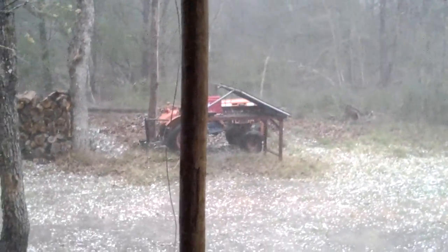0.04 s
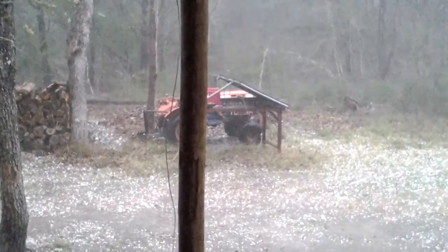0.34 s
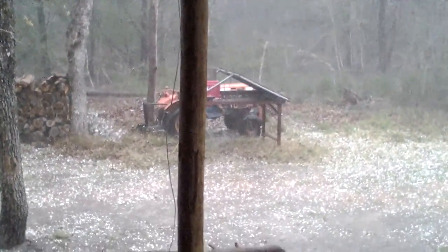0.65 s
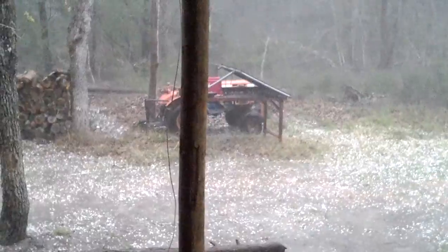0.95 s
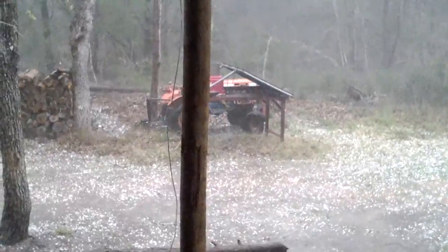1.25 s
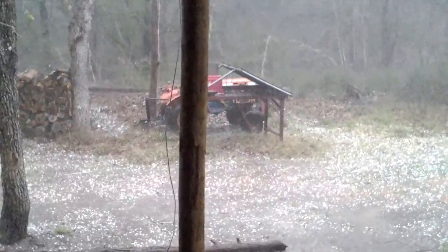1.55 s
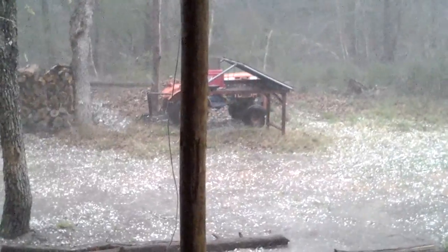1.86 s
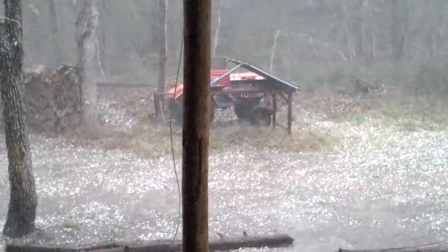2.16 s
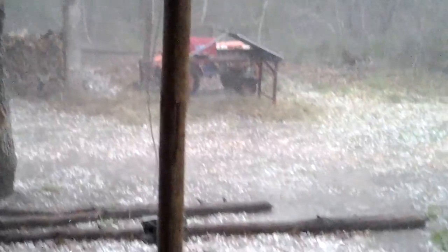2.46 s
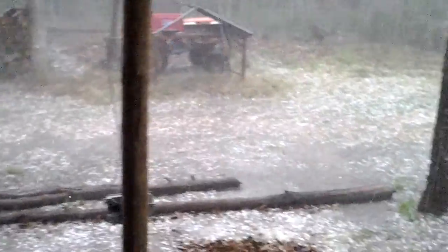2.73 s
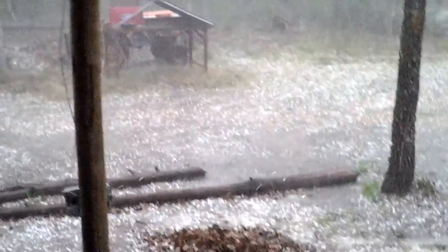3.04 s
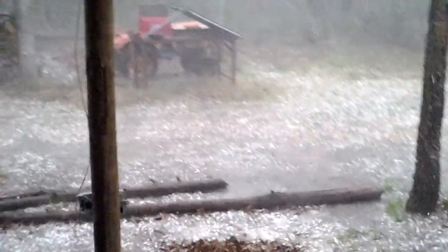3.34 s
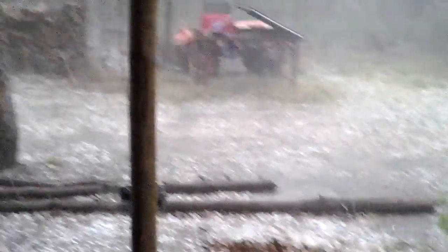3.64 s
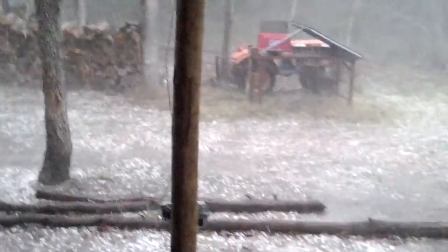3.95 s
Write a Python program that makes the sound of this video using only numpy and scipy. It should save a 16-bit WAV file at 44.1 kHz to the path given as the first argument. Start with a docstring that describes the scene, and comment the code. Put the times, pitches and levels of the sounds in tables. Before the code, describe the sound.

Heavy hail and rain roar steadily while big stones knock on a roof overhead.

```python
"""Under a porch roof in heavy hail and rain, one microphone facing the yard.
Overhead, big stones thud and knock on the roof and shatter in short sprays of ice, while many middling
ones keep it drumming and ringing. Small pellets tick close by. Farther out, countless stones and drops
merge into a roar. A fast limiter catches the loudest peaks."""
import sys
import numpy as np
from scipy import signal
from scipy.fft import rfft, irfft
from scipy.io import wavfile
from scipy.ndimage import uniform_filter1d, minimum_filter1d

SR = 44100
rng = np.random.default_rng(int(sys.argv[2]) if len(sys.argv) > 2 else 0)


def generate_wav(signal):
    """Clip the signal to [-1, 1] and save it as 16-bit WAV at the path in sys.argv[1]."""
    frames = np.transpose(np.atleast_2d(signal))
    scaled = np.clip(frames, -1, 1) * 32767
    pcm = np.round(scaled).astype(np.int16)
    wavfile.write(sys.argv[1], SR, pcm)


N = 176400  # 4 s
TIME = np.arange(N) / SR
THUD_T60_S, KNOCK_T60_S, SPRAY_T60_S = 0.14, 0.11, 0.13
ROOF_ATTACK_S, SPRAY_ATTACK_S = 0.0021, 0.0052

# Spectra of the roof's low thud, its hard knock and the bursting ice: (frequency [Hz], level [dB])
THUD_SPECTRUM = [(100, -101), (200, -20), (330, 3), (470, 3.5), (600, -4), (900, -18), (2000, -42)]
KNOCK_SPECTRUM = [(120, -55), (330, -18.5), (580, -16), (820, -2.5), (1230, -3.5), (1440, -2), (1850, -2.5),
                  (2400, -11), (5000, -20), (14000, -58)]
SPRAY_SPECTRUM = [(150, -54), (900, -18), (2500, 0.5), (5100, -1.5), (5800, -7.5), (6800, -2),
                  (8500, -10.5), (12000, -16), (14500, -25)]
# The biggest strikes overhead, each level relative to that part's base level: (time [s],
# thud level [dB], thud pitch [Hz], knock level [dB], knock pitch [Hz], spray level [dB])
BIG_STRIKES = [(.03, -13, 400, -10, 1010, -4), (.14, -14, 398, -6, 1460, -9),
               (0.296, -18, 403, 2.5, 1525, -7), (.373, -3, 478, -11, 1480, 3),
               (.416, -7, 470, -6, 1570, 5.5), (.445, 4, 546, 3.5, 1577, -6), (0.606, 0, 391, -4, 1850, 0),
               (0.683, -1, 464, -5, 1550, -9), (0.862, 2, 399, -1, 1900, 3.5),
               (0.899, 5.5, 335, -3, 1510, -6), (.956, -11, 406, 3, 1550, -14),
               (1.014, -2, 400, -1, 2000, -5), (1.076, 5, 626, 3.5, 1100, 2.5),
               (1.125, -11, 347, 4, 1740, -13), (1.168, -8, 404, 4.5, 1670, -8),
               (1.248, -10, 330, -6, 930, 3), (1.284, 0, 145, -17, 1500, 2), (1.35, 0, 407, -4, 1476, 5.5),
               (1.383, -11, 393, 2, 973, -12), (1.759, 1.5, 357, -10, 1460, 3.5),
               (1.814, 5.5, 430, 2.5, 1146, -15), (1.845, -2, 346, -4, 856, -11),
               (1.884, -17, 400, -13, 1500, 6), (2.062, -3, 353, 3.5, 1585, 6),
               (2.098, 3.5, 469, 2.5, 1070, 0), (2.171, -11, 395, -4.5, 1860, 0),
               (2.255, 3.5, 350, -5, 1480, 2), (2.292, 5, 332, 0.5, 886, -10), (2.336, 1, 402, -3, 1410, 1),
               (2.628, 1, 395, -2, 1646, 2), (2.697, -3, 403, -4, 1245, 5), (2.736, -4, 400, -3, 1454, 1),
               (2.83, -17, 403, -1.5, 1100, 1), (2.923, -16, 403, 3.5, 1316, -15),
               (3.109, -8, 398, -2.5, 1007, 6), (3.236, -8, 397, -1, 1443, -9),
               (3.348, -4, 490, 2, 1410, -19), (3.483, -19, 400, 0, 1480, 6.5),
               (3.533, 5, 588, -5, 813, -11), (3.582, -16, 402, 4.5, 1464, -1),
               (3.628, -6, 395, -2, 1020, -5), (3.683, -6, 407, -4, 1760, 3), (3.74, 6, 385, 1, 730, 2),
               (3.775, -6, 403, 0.5, 794, -11), (3.834, -7, 407, 1.5, 1517, -5),
               (3.891, 9, 658, 4.5, 1820, 1.5), (3.956, -15, 400, -7, 1480, -4)]
def big_stones(thud_base_db=-24.5, knock_base_db=-10.5, spray_base_db=-13):
    """Just above the microphone, each big stone thuds, knocks the roof and bursts into a spray of ice."""
    out = np.zeros(N)
    for start_s, thud_db, thud_hz, knock_db, knock_hz, spray_db in BIG_STRIKES:
        thud = impact(THUD_SPECTRUM, THUD_T60_S, ROOF_ATTACK_S)
        thud += amp(0.5) * roof_mode(thud_hz, t60_s=0.16)
        knock = impact(KNOCK_SPECTRUM, KNOCK_T60_S, ROOF_ATTACK_S)
        knock += amp(-3.5) * roof_mode(knock_hz, t60_s=0.13)
        spray = impact(SPRAY_SPECTRUM, SPRAY_T60_S, SPRAY_ATTACK_S)
        add(out, start_s, amp(thud_base_db + thud_db) * thud)
        add(out, start_s, amp(knock_base_db + knock_db) * knock)
        add(out, start_s, amp(spray_base_db + spray_db) * spray)
    return out


def roof_mode(hz, t60_s, size=8192):
    """The main mode of the struck spot, a dying tone that stands out of the roof's ring."""
    t = np.arange(size) / SR
    return np.sqrt(2) * np.sin(2 * np.pi * hz * t) * (1 - np.exp(-t / ROOF_ATTACK_S)) * amp(-60 * t / t60_s)


def impact(spectrum, t60_s, attack_s, colour_db=3.0, size=8192):
    """One strike: dense modes that die together, coloured differently at every spot."""
    hz, t = np.fft.rfftfreq(size, 1 / SR), np.arange(size) / SR
    colour = level_at([(f, rng.standard_normal()) for f in np.geomspace(200, 15000, 44)], hz)
    mode_gains = amp(level_at(spectrum, hz) + colour_db * colour)
    modes = irfft(rfft(rng.standard_normal(size)) * mode_gains)
    return unit(modes) * (1 - np.exp(-t / attack_s)) * amp(-60 * t / t60_s)


# The roof's strongest ring: (frequency [Hz], level [dB])
PING_SPECTRUM = [(1100, -50), (1340, -14), (1430, 3.5), (1540, -5), (1640, -8), (2000, -40)]
# Changing weight of the low drumming overhead: (time [s], level [dB])
DRUMMING_WEIGHT = [(0, 1.5), (.9, 1), (1.6, 1.5), (2.3, 1.5), (2.6, -6.5), (3.4, -2.5), (3.8, -1), (4, -4)]
def middling_stones():
    """All across the roof, middling stones drum, knock, ping and shatter."""
    thuds = shower(THUD_SPECTRUM, THUD_T60_S, ROOF_ATTACK_S, per_s=80, colour_db=1.5)
    knocks = shower(KNOCK_SPECTRUM, KNOCK_T60_S, ROOF_ATTACK_S, per_s=160, colour_db=2.5)
    pings = shower(PING_SPECTRUM, t60_s=0.21, attack_s=ROOF_ATTACK_S, per_s=30, colour_db=2)
    sprays = shower(SPRAY_SPECTRUM, SPRAY_T60_S, SPRAY_ATTACK_S, per_s=50, colour_db=0.5)
    weight_db = np.interp(TIME, *np.transpose(DRUMMING_WEIGHT))
    return amp(-32.5 + weight_db) * thuds + amp(-17.5) * knocks + amp(-25) * pings + amp(-22.5) * sprays


def shower(spectrum, t60_s, attack_s, per_s, colour_db, spread_db=3.0, spots=40):
    """Stones of random size land at random moments on many spots, each with its own ring."""
    lands = rng.random(N) < per_s / SR
    sizes = np.minimum(rng.exponential(1, N), 2.43)
    hits = lands * amp(spread_db * sizes)
    struck_spot = rng.integers(0, spots, N)
    mix_spectrum = 0
    for spot in range(spots):
        ring = impact(spectrum, t60_s, attack_s, colour_db)
        mix_spectrum += rfft(hits * (struck_spot == spot)) * rfft(ring, N)
    return unit(irfft(mix_spectrum, N))


# The bright tick of one pellet: (frequency [Hz], level [dB])
TICK_SPECTRUM = [(300, -40), (1500, -7), (3000, 10.5), (5100, 6), (5800, -2), (6800, 11.5), (8500, 2.5),
                 (12000, -32), (14500, -9)]
def pellets():
    """Small pellets and chips of ice tick close to the microphone."""
    ticks = shower(TICK_SPECTRUM, t60_s=0.012, attack_s=0.00038, per_s=800, colour_db=2, spread_db=6.5)
    return amp(-24.5) * ticks


# The whole yard as heard from the porch: (frequency [Hz], level [dB])
YARD_SPECTRUM = [(20, -39), (115, -55), (170, -33.5), (230, -15), (330, -7), (460, -7), (570, -11.5),
                 (640, -12.5), (730, -1.5), (840, 0), (1250, -2), (1430, 0.5), (1800, -0.5), (2250, -5.5),
                 (3300, -8), (5100, -10.5), (5800, -13.5), (6800, -11.5), (8300, -18), (10000, -22),
                 (12500, -32.5), (14500, -34)]
def yard_roar(patch_db=1.3, flicker_db=0.64):
    """Distant hail and rain merge into a wash with drifting patches and a quick flicker in level."""
    frames, hz = N // 256 + 5, np.fft.rfftfreq(1024, 1 / SR)
    real, imag, patches = rng.standard_normal((3, frames, len(hz)))
    patches = uniform_filter1d(patches, size=10, axis=0)  # about 60 ms long
    patches = unit(uniform_filter1d(patches, size=12, axis=1))  # about 500 Hz wide
    flicker = unit(uniform_filter1d(rng.standard_normal(frames), size=8))[:, None]
    gains = amp(level_at(YARD_SPECTRUM, hz) + patch_db * patches + flicker_db * flicker)
    _, wash = signal.istft(((real + 1j * imag) * gains).T, nperseg=1024, noverlap=768)
    return amp(-13.5) * unit(wash[:N])


def amp(db):
    """Decibels to gain."""
    return 10 ** (np.asarray(db) / 20)


def unit(x):
    """Scales to rms 1."""
    return x / np.sqrt(np.mean(x ** 2) + 1e-20)


def level_at(spectrum, hz):
    """A spectrum's level in dB, interpolated on a log-frequency axis."""
    points_hz, db = np.transpose(spectrum)
    return np.interp(np.log(hz + 1), np.log(points_hz), db)


def add(mix, start_s, sound):
    """Mixes a sound in at a time."""
    part = mix[max(round(start_s * SR), 0):][:len(sound)]
    part += sound[:len(part)]


# How hard the hail falls on roof and yard: (time [s], level [dB])
FALL_STRENGTH = [(0, 1), (.3, 0), (.5, .2), (.78, 0), (1.0, 0.2), (1.2, -0.9), (1.6, 0.7), (2.0, 0.5),
                 (2.35, -0.1), (2.55, -0.1), (2.85, -0.5), (3.05, 0), (3.25, 0.5), (3.6, 0.2), (3.78, 0),
                 (4, 1.7)]
def scene():
    """From under the roof: the downpour swells and eases slightly, and big stones stand out of it."""
    strength = amp(np.interp(TIME, *np.transpose(FALL_STRENGTH)))
    downpour = strength * (yard_roar() + middling_stones() + pellets())
    return (downpour + big_stones())[None]


def record(dry, bass_cut_hz=175, bass_leak_db=-17, limiter_s=0.00059, top_hz=14650):
    """Behind the microphone, the recorder thins the bass, limits the peaks and cuts the highest treble."""
    highpass = signal.butter(8, bass_cut_hz, "high", fs=SR, output="sos")
    thinned = signal.sosfilt(highpass, dry) + amp(bass_leak_db) * dry
    span = 2 * round(limiter_s * SR) + 1
    needed_gain = 1 / np.maximum(abs(thinned), 1)  # holds peaks to full scale
    limited = thinned * uniform_filter1d(minimum_filter1d(needed_gain, span), span)
    rumble_shelf = amp(level_at([(110, -7), (170, 0.033)], np.fft.rfftfreq(N, 1 / SR)))
    shelved = irfft(rfft(limited) * rumble_shelf, N)
    lowpass = signal.firwin(511, top_hz, window=("kaiser", 9), fs=SR)
    return signal.oaconvolve(shelved, lowpass[None], "same")


dry = scene()
out = record(dry)
generate_wav(out)
```